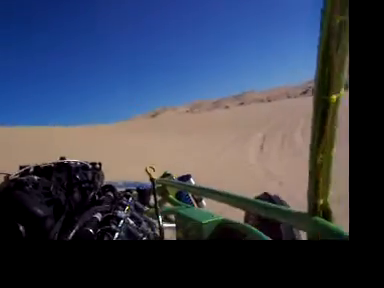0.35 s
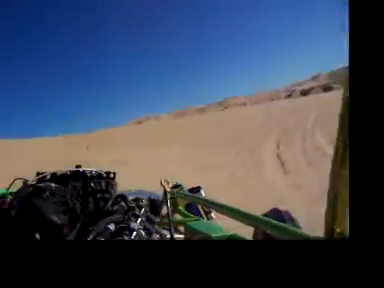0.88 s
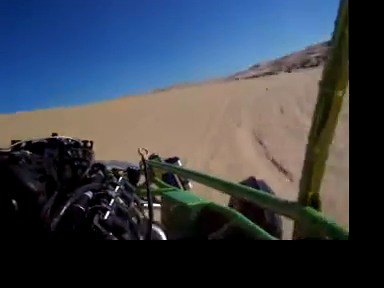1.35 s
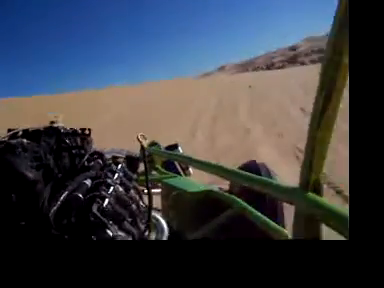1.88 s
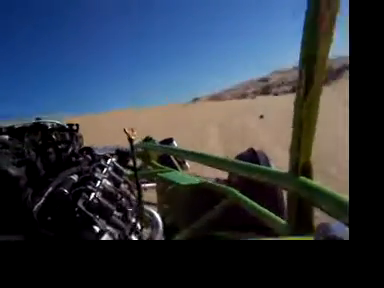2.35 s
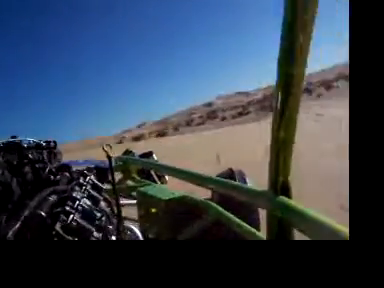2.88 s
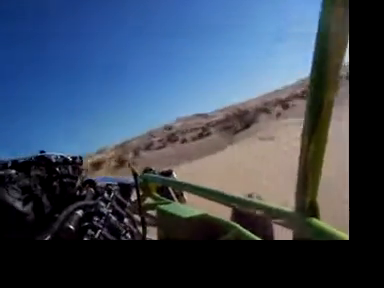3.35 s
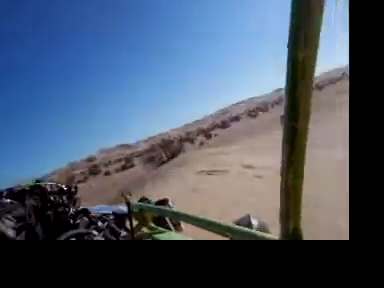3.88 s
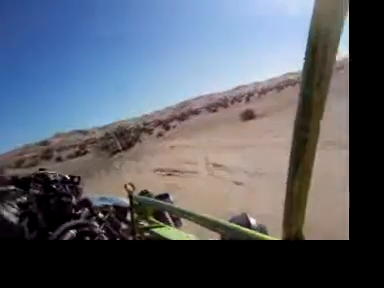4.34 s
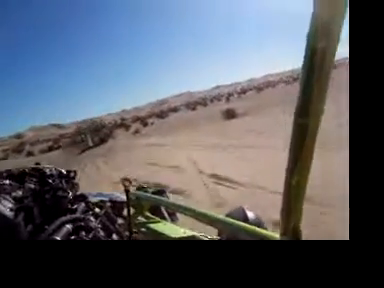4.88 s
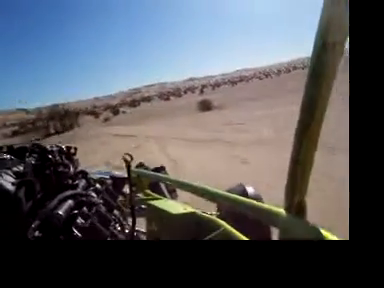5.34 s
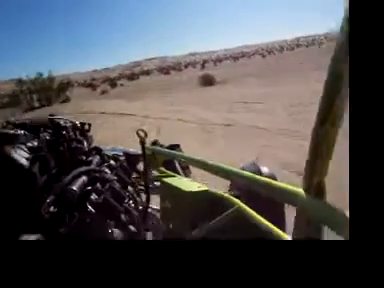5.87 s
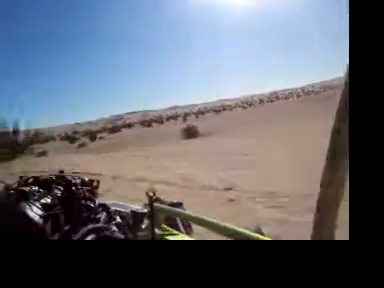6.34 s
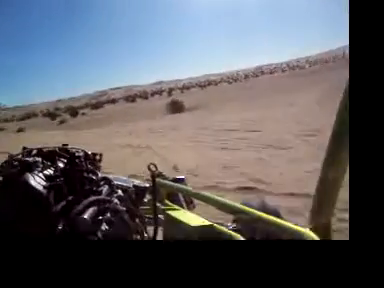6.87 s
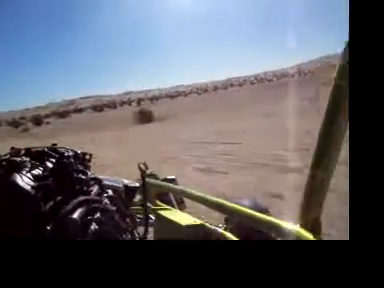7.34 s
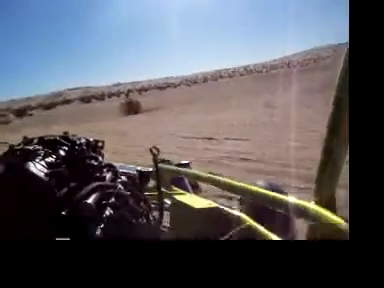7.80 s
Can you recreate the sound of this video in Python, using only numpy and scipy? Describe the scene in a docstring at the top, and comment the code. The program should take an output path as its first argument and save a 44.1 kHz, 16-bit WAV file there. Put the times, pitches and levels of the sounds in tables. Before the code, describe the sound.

A loud open exhaust blares close by, pulses crowded into a rough, raspy drone. Its pitch slides down over the first few seconds, a whine and other engine tones surface, and a hollow bark comes as load returns. Afterwards the engine runs lower and steadier, burbling unevenly with a faint buzz. Wind thuds low on the microphone outdoors, without noticeable echo; clipping flattens everything into a narrow, gritty band.

```python
"""Open buggy engine slowing on sand

Heard from the seat, an eight-cylinder engine slows from high revs, then holds a lower, slightly varying speed.
Its two banks fire unevenly, and each firing is a click that makes the exhaust pipe of its bank ring.
Gas rasps as filtered noise, a gear whines and other tones follow the engine; wind buffets as low noise.
The small recorder is driven far into overload, which flattens the peaks, and passes only a narrow band."""
import sys
import numpy as np
from scipy import signal
from scipy.io import wavfile

SR = 44100
rng = np.random.default_rng(int(sys.argv[2]) if len(sys.argv) > 2 else 0)


def attenuation_scalar(level_db):
    """Turn a level in dB into a linear amplitude multiplier (20 dB per decade)."""
    decades = np.asarray(level_db, float) / 20
    return 10 ** decades


def int16_out(signal):
    """Quantize to a 16-bit WAV file."""
    q = np.round(np.clip(np.atleast_2d(signal).T, -1, 1) * 32767)
    wavfile.write(sys.argv[1], SR, q.astype(np.int16))


N = 351036  # length in samples

# One engine cycle is two crank turns, in which each cylinder fires once.
HIGH_REVS = 20.0  # cycles per s at which the bark and rasp level settings hold


def rms_one(x):
    """Scale a signal so that its average strength (rms) is 1."""
    return x / np.sqrt(np.mean(x ** 2) + 1e-20)


def in_time(rows):
    """Join the points of a table by straight lines: one curve per column after the time."""
    times, *columns = np.transpose(rows)
    return [np.interp(np.arange(N) / SR, times, column) for column in columns]


def drift(rate_hz):
    """Slow random wander of rms 1: noise smoothed by two equal low-pass filters with corners at rate_hz."""
    step = 40  # samples between the coarse points
    r = np.exp(-2 * np.pi * rate_hz * step / SR)
    noise = rng.standard_normal(N // step + 2002)
    slow = signal.lfilter([1], [1, -2 * r, r * r], noise)[2000:]  # drop the filter's start-up
    return np.interp(np.arange(N) / step, np.arange(len(slow)), rms_one(slow))


def resonance(x, hz, width_hz):
    """Ring like a hollow body at one pitch, with gain 1 at the peak; a wider peak dies away faster."""
    r = np.exp(-np.pi * width_hz / SR)
    feedback = [1, -2 * r * np.cos(2 * np.pi * hz / SR), r * r]
    return signal.lfilter([(1 - r * r) / 2, 0, (r * r - 1) / 2], feedback, x)


def wind():
    """Wind buffets the microphone port, heard as lumpy low noise that wavers in strength."""
    # strength of the buffeting: (time [s], level [dB])
    wind_level = [(0, -19), (2.2, -19), (3.1, -18), (4, -23), (5.4, -21), (6.4, -17), (7.96, -18)]
    low_hz, high_hz, gust_db = 24.8, 117, 1
    band = signal.butter(2, [low_hz, high_hz], "band", fs=SR, output="sos")
    rumble = signal.sosfilt(band, rng.standard_normal(N))
    gusts = rms_one(rumble * attenuation_scalar(gust_db * drift(16.0)))
    return attenuation_scalar(in_time(wind_level)[0]) * gusts


def drones(cycles):
    """Sines locked to the engine cycle, each under one smooth swell."""
    # swelling tones: (centre [s], length [s], order [waves per cycle], peak level [dB])
    swells = [(1.904, 2.8, 8, -13), (1.997, 1.4, 11, -15), (3.098, 1.0, 13, -19.5), (3.251, 1.1, 17, -13),
              (3.4, 1.9, 3, -19.5), (2.895, 0.84, 4, -15)]
    s = np.arange(N) / SR
    out = np.zeros(N)
    for centre, length, order, db in swells:
        swell = np.cos(np.pi * np.clip((s - centre) / length, -.5, .5)) ** 2
        out -= attenuation_scalar(db) * swell * np.cos(2 * np.pi * order * cycles)
    return out


def buzz(cycles):
    """A low-revs buzz of a few tones locked to the engine cycle, each wavering in level."""
    # tones of the buzz: (order [waves per cycle], relative level [dB])
    tones = [(11, -11.5), (13, -12), (16, -4), (18, -11), (19, -0.5), (20, 8)]
    # strength of the whole buzz: (time [s], level [dB])
    buzz_level = [(2.8, -54), (3.3, -31), (3.75, -23.5), (4.3, -20), (5.2, -26.5), (7.96, -28.5)]
    out = np.zeros(N)
    for order, db in tones:
        level = attenuation_scalar(db + 3.23 * drift(4.6))
        out += level * np.sin(2 * np.pi * (order * cycles + rng.random()))  # random starting point
    return attenuation_scalar(in_time(buzz_level)[0]) * out


def whine(cycles_per_s):
    """Gear teeth mesh at a wavering multiple of engine speed, and the tone throbs once per crank turn."""
    # strength of the whine before waver and throb: (time [s], level [dB])
    whine_level = [(2.4, -45), (2.55, -23.5), (2.95, -19.5), (3.15, -25), (3.65, -27.5), (4.1, -29.5),
                   (4.8, -30.5), (5.1, -27), (5.45, -27), (6.3, -42)]
    meshes_per_cycle, wander = 153.8, .012  # wander: share of the pitch
    hz = meshes_per_cycle * cycles_per_s * (1 + wander * drift(60.0))
    throb = 1 + .9 * np.sin(4 * np.pi * np.cumsum(cycles_per_s) / SR)
    level = attenuation_scalar(in_time(whine_level)[0] + 2.0 * drift(25.0))
    return level * throb * np.sin(2 * np.pi * np.cumsum(hz) / SR)


def firings(cycles):
    """One click train per bank; every firing differs a little in strength and timing."""
    # cylinders in firing order: (bank, relative strength [dB], header pipe delay [ms])
    cylinders = [(0, 3.5, 1.25), (1, 3.6, 1.12), (0, 3.2, 0.53), (0, 2.7, 1.23), (1, 3.6, 0.67),
                 (0, 1.9, 0.99), (1, 3.3, 2.03), (1, 2.5, 0.18)]
    uneven_db, jitter_ms = .4, .04  # random spread from one firing to the next
    first_firing = -.034  # shift of all firings, in cycles
    bank, strength_db, delay_ms = np.transpose(cylinders)
    nth = np.arange(1, int(cycles[-1] * len(bank)))
    cylinder = nth % len(bank)
    chance = rng.standard_normal((len(nth), 2))
    s = np.interp(nth / len(bank) + first_firing, cycles, np.arange(N) / SR)
    s = s + (delay_ms[cylinder] + jitter_ms * chance[:, 0]) / 1000
    at = np.clip(s * SR, 0, N - 1).astype(int)
    trains = np.full((2, N), 1e-18)  # practically silent between clicks
    trains[bank[cylinder].astype(int), at] = attenuation_scalar(strength_db[cylinder] + uneven_db * chance[:, 1])
    return trains


def rasp(trains, cycles_per_s):
    """Turbulent gas: a dying puff after every firing over a steady stream; each resonance flickers on its own."""
    # resonances that colour the gas: (frequency [Hz], width of each of two passes [Hz], relative level [dB])
    colours = [(192, 162, 3), (292, 156, -0.5), (483, 193, -2.5), (711.7, 135, -1.5), (787, 355, -4),
               (1109, 580, -10.5), (1690, 2750, -19.5), (2526, 630, -10.5), (4200, 3600, -12.5)]
    puff_ms, steady_share = 1.22, 2.22  # fading time of a puff; stream against puffs of rms 1
    rasp_db, db_per_cycle = -8, 0.9057  # level at high revs; change per cycle/s of speed
    # the hollow resonance swells once as the engine takes up load again
    hollow_hz, hollow_db = 730, 9
    start_s, rise_s, fade_s = 3.15, 0.35, 1.2
    since = np.maximum(np.arange(N) / SR - start_s, 0)
    rise = np.minimum(since / rise_s, 1)
    fade = np.exp(-np.maximum(since - rise_s, 0) / fade_s)
    swell_db = hollow_db * rise * fade

    puffs = signal.lfilter([1], [1, -np.exp(-1000 / (puff_ms * SR))], trains.sum(axis=0))
    flow = (steady_share + rms_one(puffs)) * attenuation_scalar(0.5 * drift(11.0))
    out = np.zeros(N)
    for hz, width_hz, db in colours:
        gas = rng.standard_normal(N) * flow * attenuation_scalar(1.22 * drift(19.0))
        coloured = resonance(resonance(gas, hz, width_hz), hz, width_hz)
        is_hollow = abs(hz / hollow_hz - 1) < .05
        out += attenuation_scalar(db + swell_db * is_hollow) * coloured
    return attenuation_scalar(rasp_db + db_per_cycle * (cycles_per_s - HIGH_REVS)) * rms_one(out)


def exhaust(trains, cycles_per_s):
    """Each bank's pulses ring the resonances of its pipe, each arriving after its own travel time."""
    # exhaust resonances: (bank, frequency [Hz], width [Hz], relative level [dB], travel delay [ms])
    pipes = [(0, 41.7, 26.2, -9.1, 4.93), (0, 50.7, 33.0, -8.1, 1.19), (0, 97.2, 23.3, -14.2, 5.93),
             (0, 154.3, 12.0, -29.9, 4.43), (0, 175.0, 110.0, -16.9, 3.91), (0, 277.3, 110.0, -18.0, 0.04),
             (0, 288.7, 14.7, -24.0, 1.58), (1, 43.3, 31.9, -9.3, 3.13), (1, 92.1, 22.1, -6.3, 4.75),
             (1, 112.5, 40.7, -16.7, 10.51), (1, 156.4, 40.6, -17.0, 1.86), (1, 215.5, 75.2, -21.4, 4.64),
             (1, 279.8, 12.0, -25.8, 2.38), (1, 345.2, 110.0, -21.5, 3.99)]
    # firing strength as heard in the low pipe resonances: (time [s], level [dB])
    effort = [(0.0, 13.5), (1.27, 13), (1.77, 12), (2.3, 17), (3.23, 3), (3.9, 7.5), (4.65, 8), (5.2, 6.5),
              (6.3, 4.5), (7.96, 3.5)]
    # limits of the rounded exhaust pulses: (low [Hz], high [Hz])
    pulse_band = [44, 415]
    bark_from_hz = 170  # resonances above this follow the bark level
    bark_db, db_per_cycle = -1, 0.96  # high against low resonances at high revs; change per cycle/s
    boom_level, = in_time(effort)
    bark_level = boom_level + bark_db + db_per_cycle * (cycles_per_s - HIGH_REVS)
    out = np.zeros(N)
    for bank, hz, width_hz, db, delay_ms in pipes:
        late = round(delay_ms * SR / 1000)
        effort_db = bark_level if hz > bark_from_hz else boom_level
        ringing = attenuation_scalar(db + effort_db) * resonance(trains[int(bank)], hz, width_hz)
        out[late:] += ringing[:N - late]
    # the pulses are rounded, and the deepest bass is cut away
    soft = signal.firwin(1601, pulse_band, pass_zero=False, fs=SR)
    return attenuation_scalar(53.5) * signal.fftconvolve(out, soft, "same")  # 53.5 dB gain for the brief clicks


def scene():
    """All engine layers follow one crankshaft, and wind is added."""
    # engine speed: (time [s], speed [cycles per s])
    speed = [(0.0, 20.28), (0.49, 20.16), (1.26, 19.48), (1.49, 20.0), (1.77, 19.16), (2.44, 17.92),
             (2.94, 16.1), (3.46, 14.87), (4.19, 14.43), (4.37, 14.64), (5.22, 15.14), (5.47, 14.92),
             (5.71, 14.33), (6.23, 14.03), (6.93, 14.01), (7.29, 14.2), (7.96, 13.96)]
    cycles_per_s, = in_time(speed)
    cycles = np.cumsum(cycles_per_s) / SR  # cycles turned so far
    trains = firings(cycles)
    tones = drones(cycles) + buzz(cycles) + whine(cycles_per_s)
    engine = tones + rasp(trains, cycles_per_s) + exhaust(trains, cycles_per_s)
    return (wind() + engine)[None]


def band_limit(x):
    """A steep low-pass at the top of the band."""
    return signal.sosfilt(signal.butter(12, 15900, fs=SR, output="sos"), x)


def record(dry):
    """The input clips flat, a steep symmetric filter narrows the band, and its overshoot clips again."""
    overload, full_scale, offset = .695, .714, .011  # two clipping limits and a constant shift
    band_hz = 3713  # upper edge of the band
    steep = signal.firwin(101, band_hz, window=("kaiser", 7.0), fs=SR)
    clipped = np.clip(dry, -overload, overload)
    narrow = signal.fftconvolve(clipped, [steep], "same")
    mix = np.clip(narrow, -full_scale, full_scale) + offset
    return band_limit(mix)


dry = scene()
out = record(dry)
int16_out(out)
```